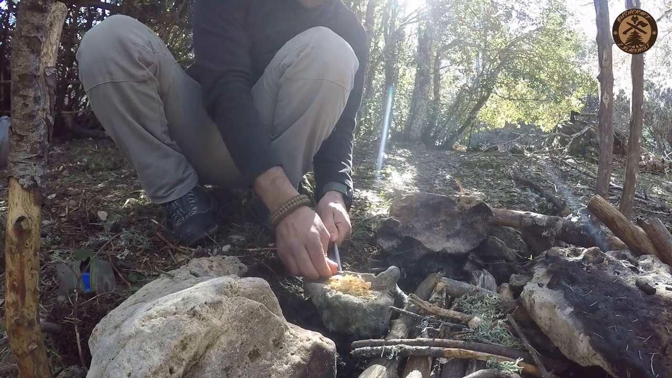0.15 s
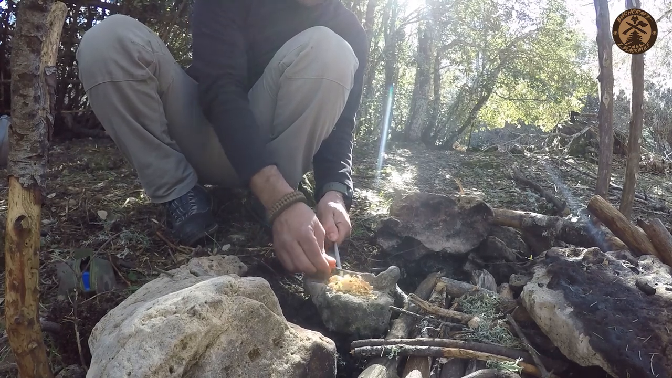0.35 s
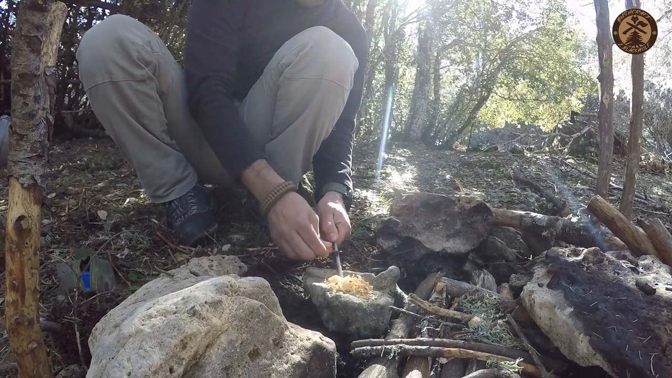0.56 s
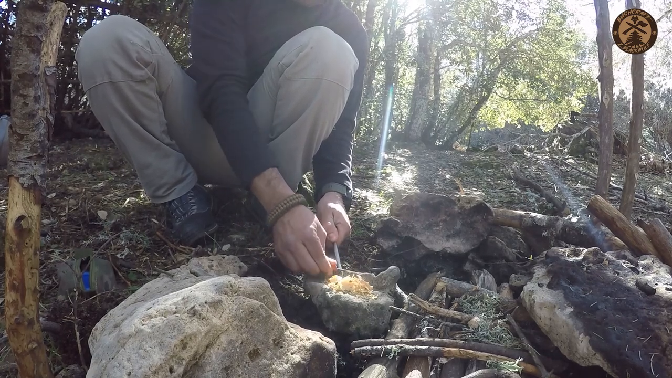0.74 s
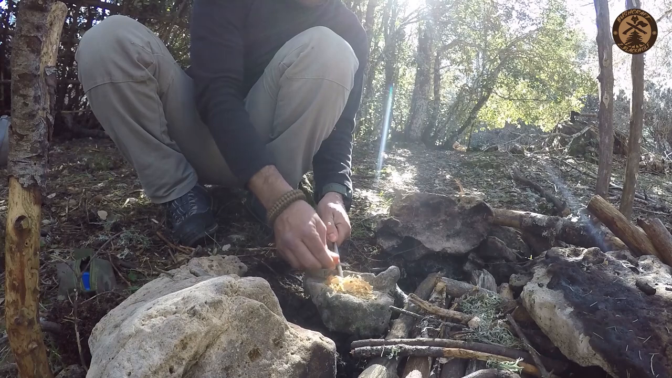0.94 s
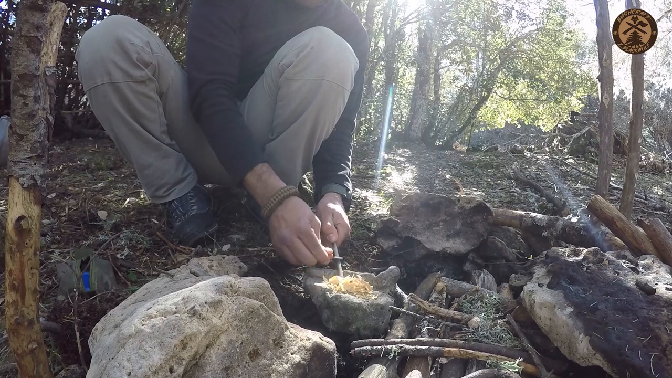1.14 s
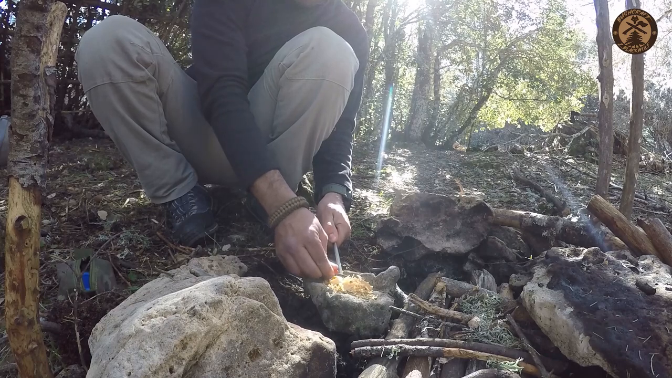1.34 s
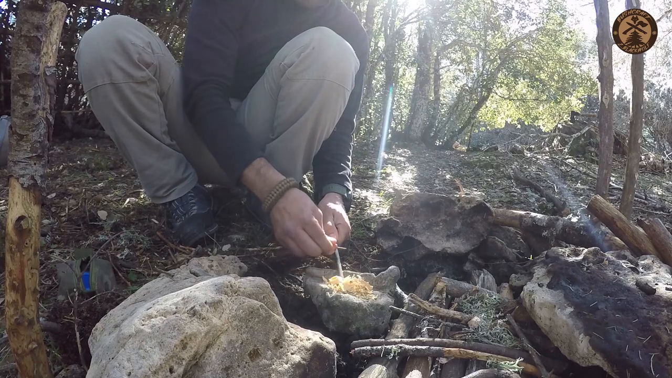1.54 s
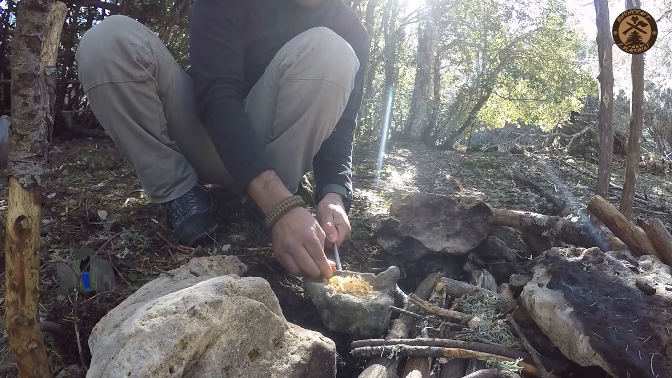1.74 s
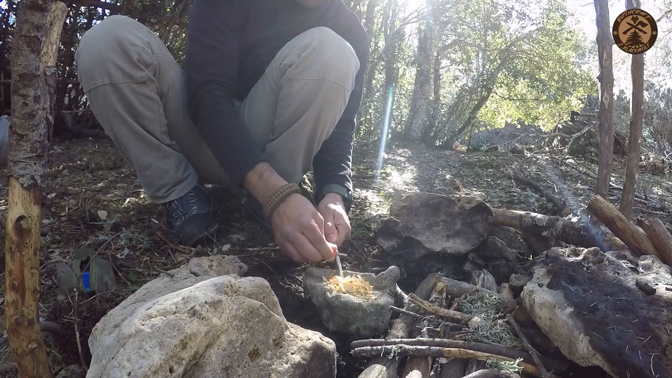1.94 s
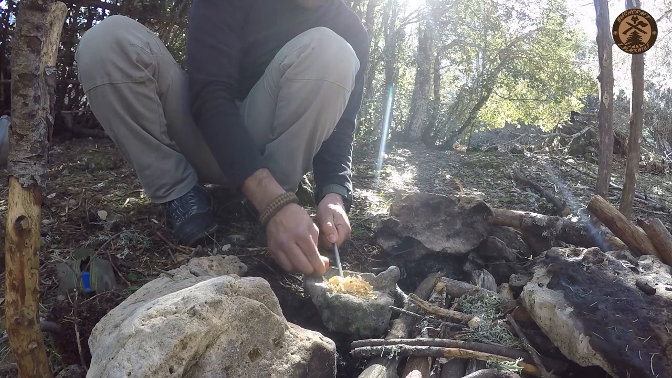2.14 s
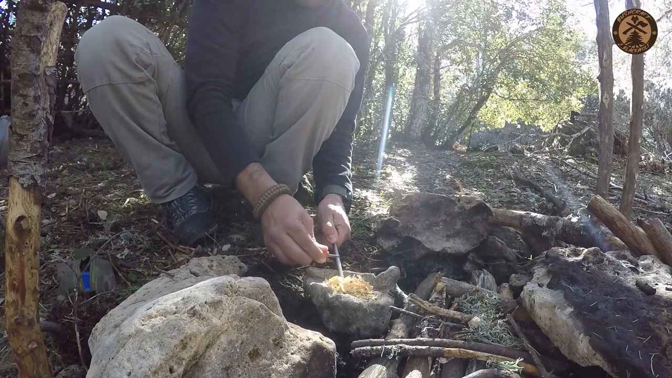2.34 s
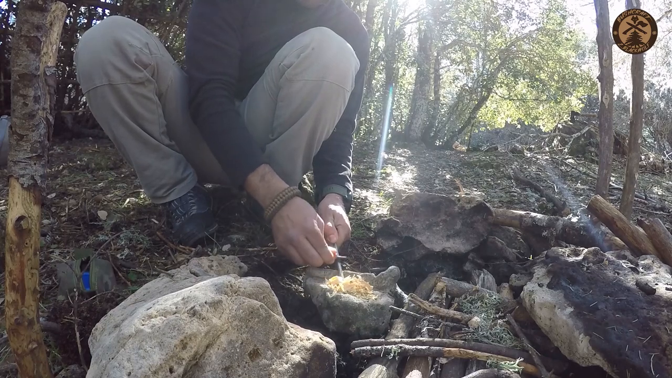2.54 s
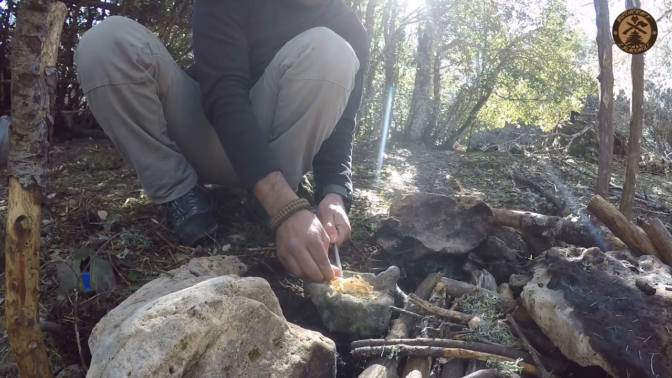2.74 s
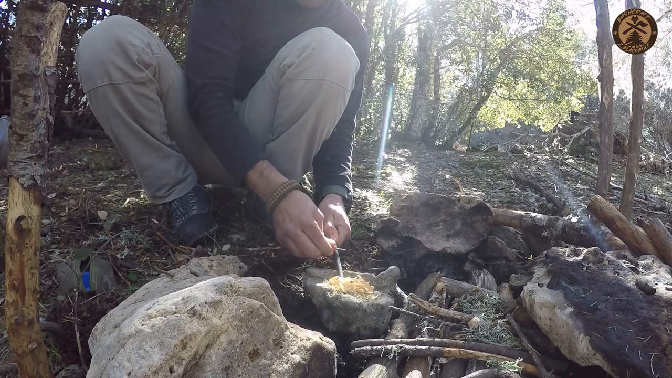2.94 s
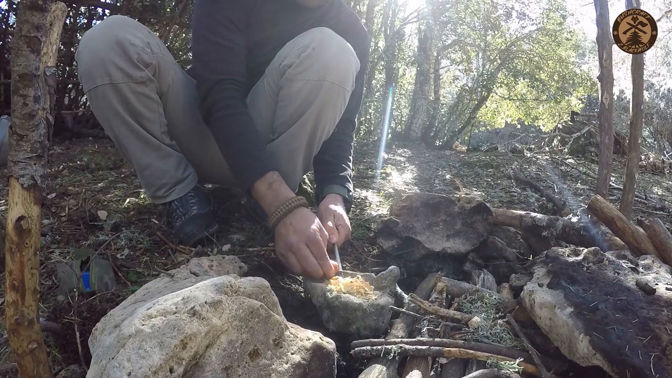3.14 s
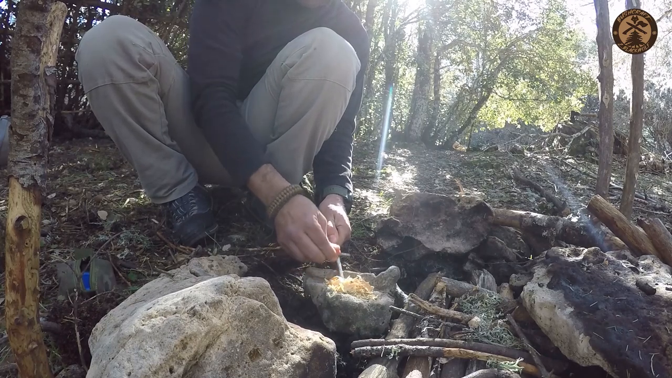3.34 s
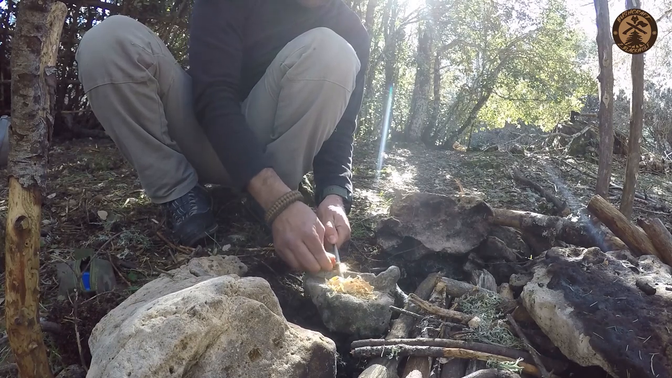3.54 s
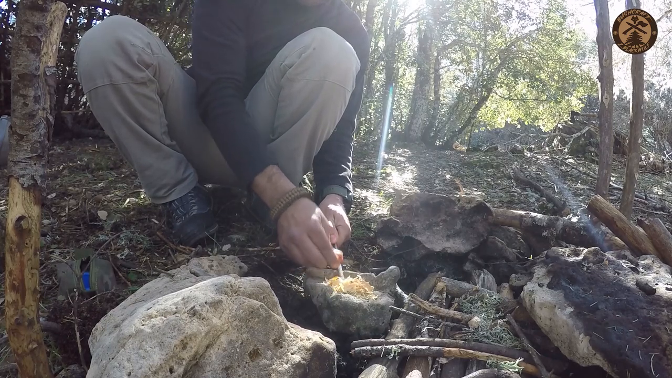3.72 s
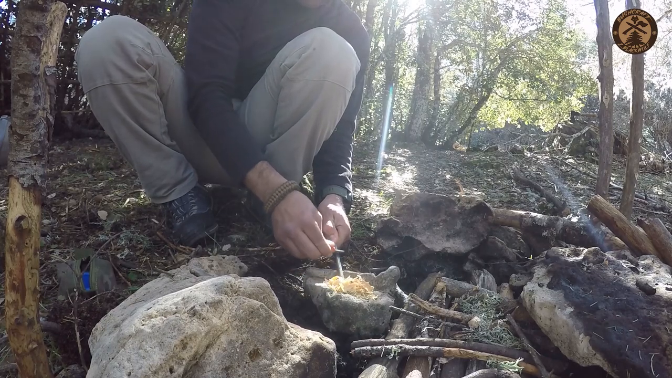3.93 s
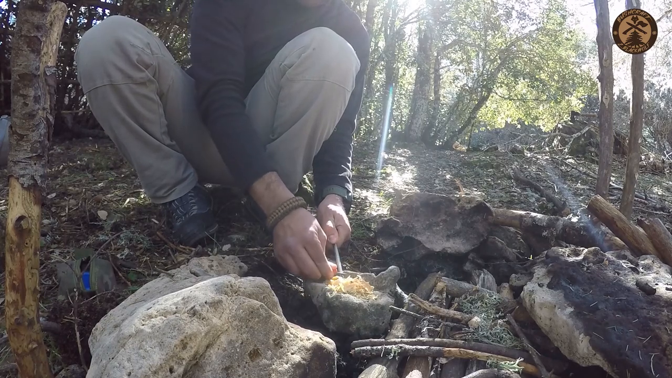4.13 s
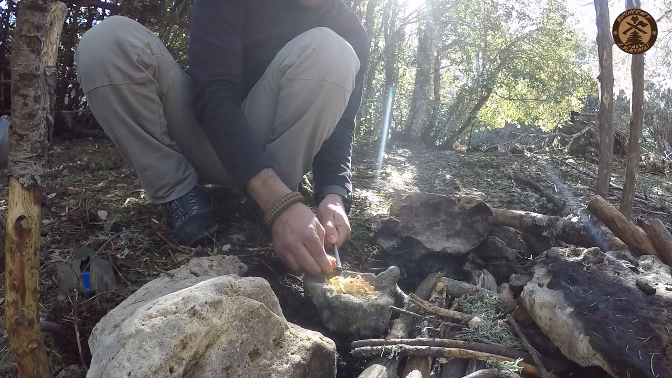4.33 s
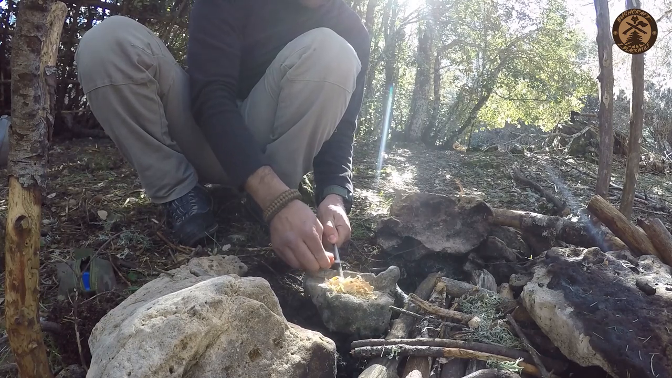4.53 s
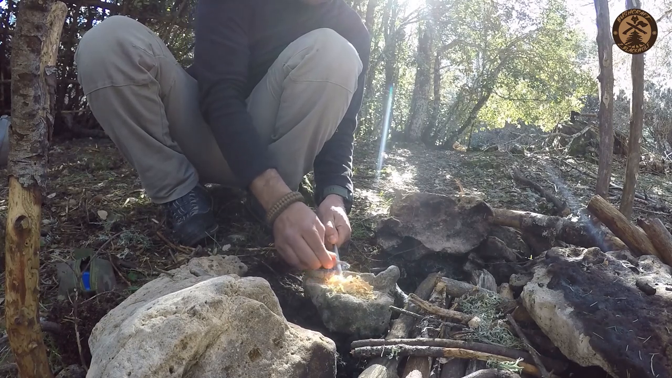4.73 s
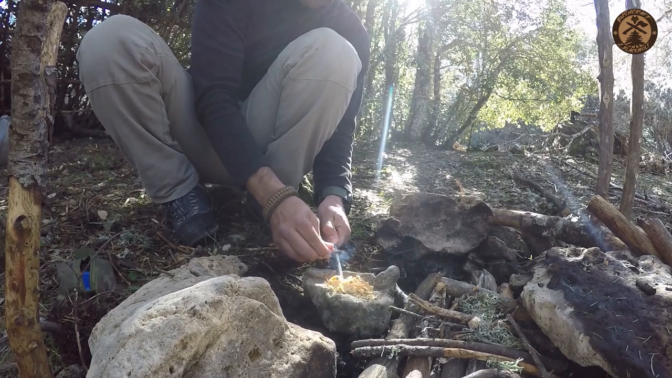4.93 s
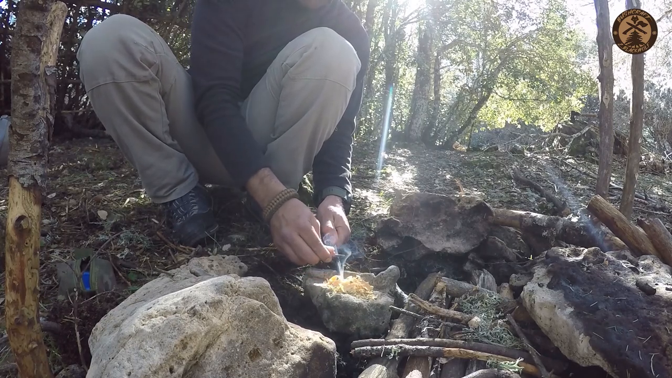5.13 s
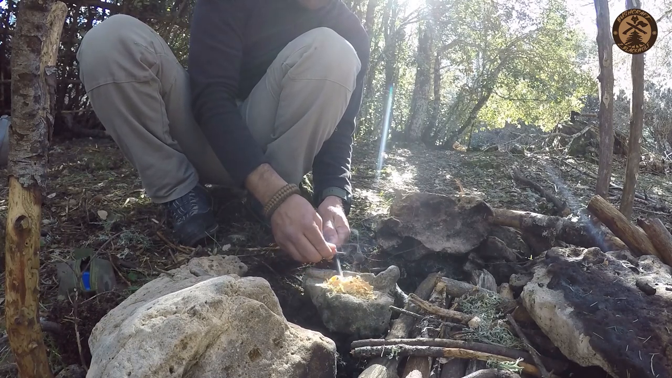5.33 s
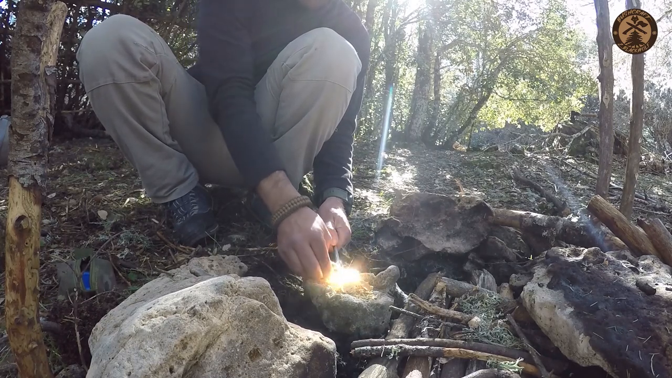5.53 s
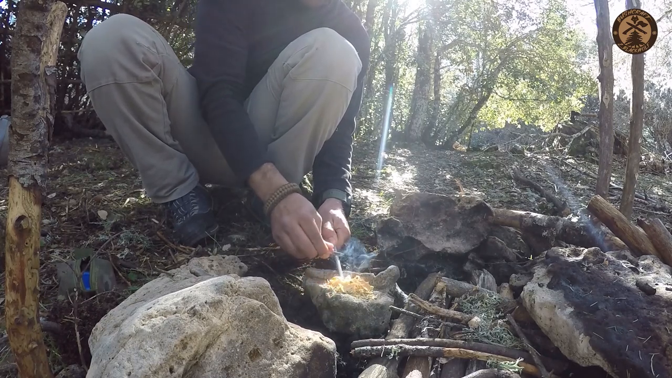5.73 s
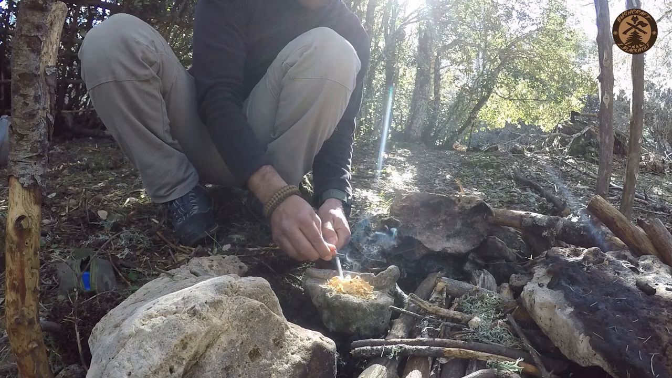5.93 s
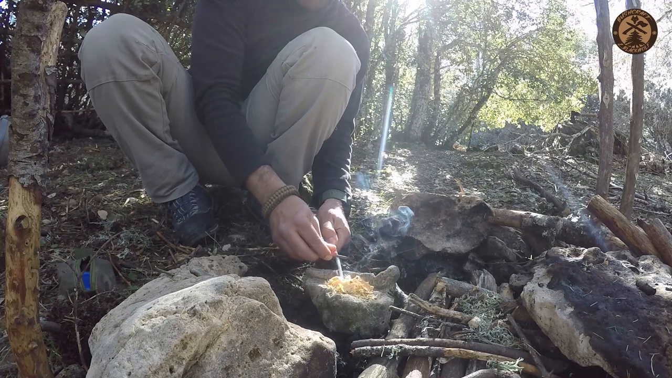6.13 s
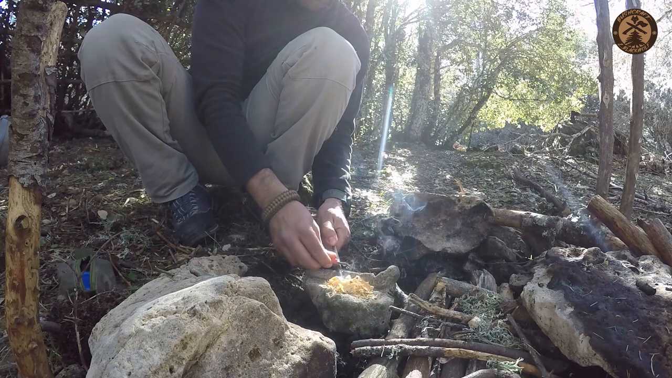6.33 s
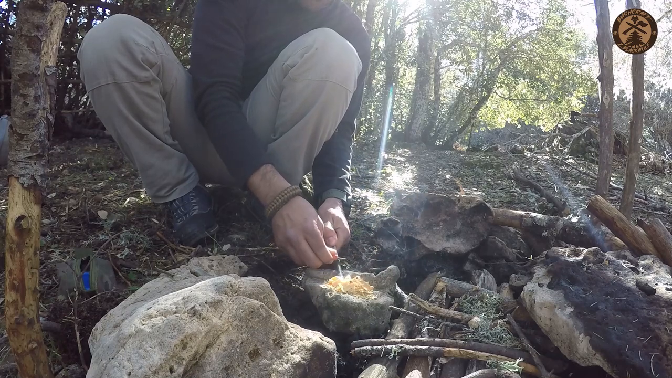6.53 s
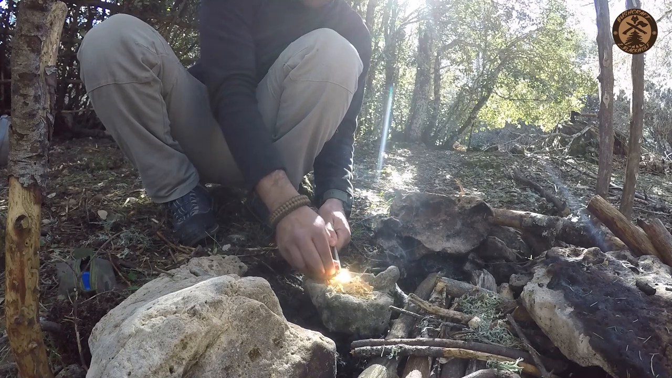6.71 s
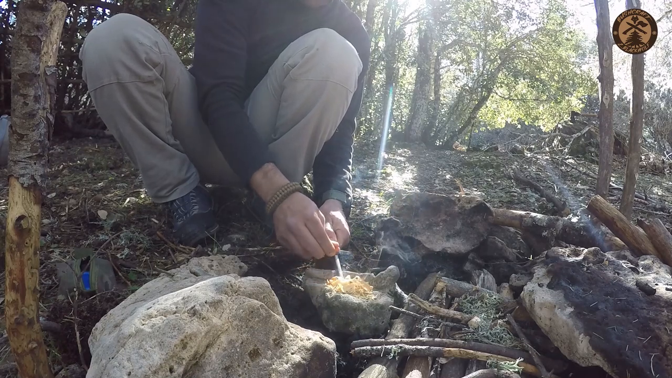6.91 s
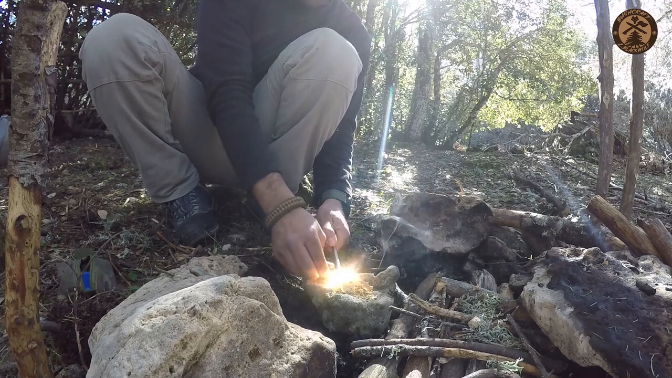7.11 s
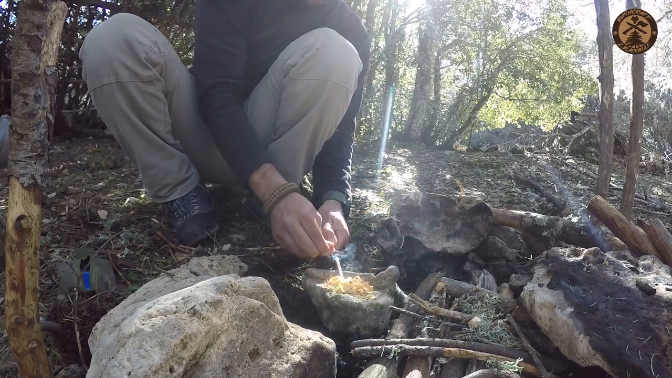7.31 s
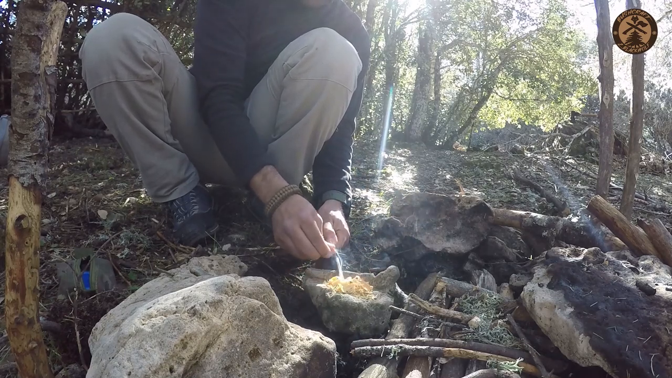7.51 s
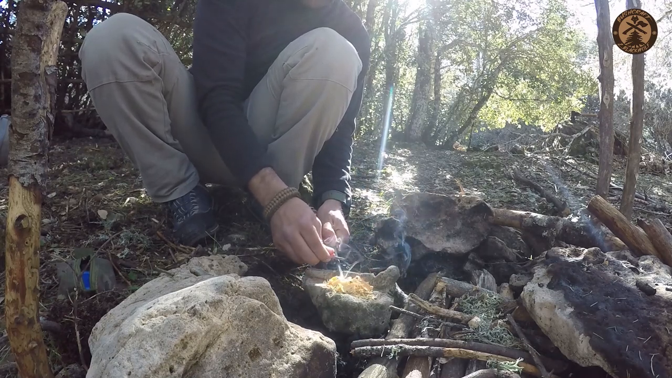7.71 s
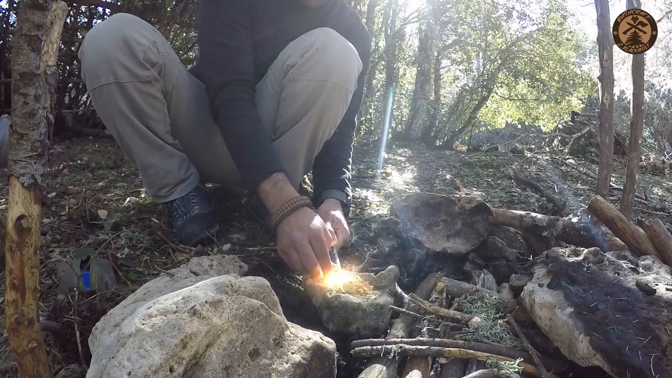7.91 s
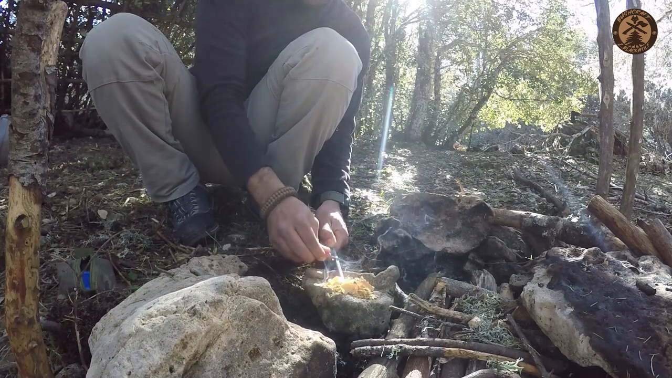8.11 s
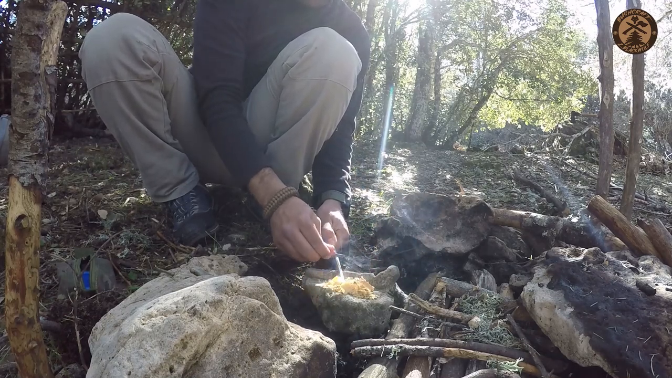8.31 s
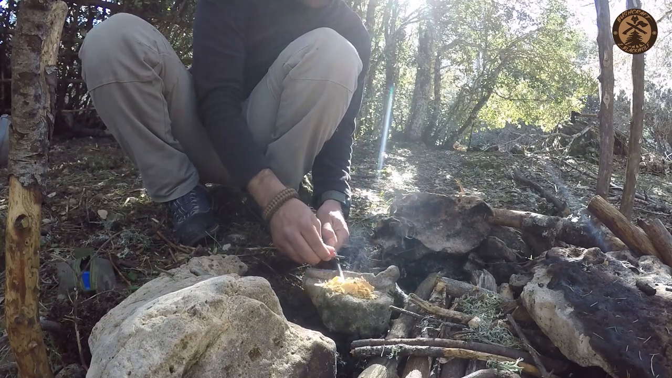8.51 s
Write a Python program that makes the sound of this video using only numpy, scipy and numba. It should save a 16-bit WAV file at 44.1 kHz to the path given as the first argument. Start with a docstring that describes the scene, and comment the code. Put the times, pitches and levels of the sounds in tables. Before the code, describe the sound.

Quiet woodland air, a low rumble under faint hiss, runs throughout. At 0 s a light steel scrape is already under way, with soft dull hand bumps near 0.1 s and tiny spark crackles around 0.35 s. From 0.6 to 4.4 s, nine more faint, thin, hissing strokes follow about every half second, most led by a crisp metallic tick; a spark pops at 2.2 s. At 4.6 s the edge bites hard, with a low bump and a rasp, then sizzling sparks until 5.1 s. A louder, longer tearing stroke swells at 5.5 s with pops. After small ticks and bumps, hard rasps come at 6.6 and 7.1 s, the latter bursting into crackle and fizz around 7.35 s. The last, at 7.9 s, sets off the loudest snaps near 8.1 s, sputtering out by 8.6 s. Close, dry, about a metre away, with faint scattering from stones and trees.

```python
"""In a quiet wood, a low rumble under a faint hiss goes on throughout; a light scrape of steel opens the scene.
A steel striker is worked along a fire steel over tinder, about a metre away. Each stroke swells and sags,
and many start with a tick as the edge lands. Ten light strokes hiss finely; five hard ones bite and rasp.
Sparks, most of them around the hard strokes, pop and sizzle; the hands make soft bumps.
All of it is made from random noise, tiny clicks and short pushes, shaped by filters and resonances."""
import sys
import numpy as np
from scipy import signal
from scipy.fft import rfft, irfft
from scipy.io import wavfile
from scipy.ndimage import uniform_filter1d
from numba import njit

SR = 44100
rng = np.random.default_rng(int(sys.argv[2]) if len(sys.argv) > 2 else 0)


def to_wav(s):
    """Save 16-bit WAV."""
    ch = np.atleast_2d(s).T  # columns
    pcm = np.round(np.clip(ch, -1, 1) * 32767)  # PCM
    wavfile.write(sys.argv[1], SR, pcm.astype(np.int16))


N = 381906  # length in samples


def undb(db):
    """Turn decibels into a gain."""
    return 10 ** (np.asarray(db) / 20)


def unit(x):
    """Scale to an average strength (rms) of 1."""
    return x / np.sqrt(np.mean(x ** 2))


def even(x, window_s=0.018):
    """Hold the rms near 1 over a short window, keeping the fine grain."""
    power = np.abs(uniform_filter1d(x ** 2, int(window_s * SR) + 1))
    return x / np.sqrt(power + 1e-12)


def add(track, s, sound):
    """Mix a sound into the track from time s on."""
    i = max(int(s * SR), 0)
    track[i:i + len(sound)] += sound[:len(track) - i]


def cut(x, hz, kind, order=4):
    """Low-pass or high-pass filter."""
    return signal.sosfilt(signal.butter(order, min(hz, .45 * SR), kind, fs=SR, output="sos"), x)


def resonate(x, hz, width_hz):
    """One resonance, gain 1 at its centre."""
    return signal.lfilter(*signal.iirpeak(min(hz, .45 * SR), hz / width_hz, fs=SR), x)


@njit
def slide(x, hz, width):
    """A resonance whose centre moves, gain 1 at the centre."""
    y, band, low = np.empty(len(x)), 0., 0.
    for i in range(len(x)):
        g, k = np.tan(np.pi * hz[i] / SR), width / hz[i]
        v = (band + g * (x[i] - low)) / (1 + g * (g + k))
        band, low, y[i] = 2 * v - band, low + 2 * g * v, k * v
    return y


def colour(x, points, size=4096):
    """Filter with the given (pitch_hz, level_db) spectrum, without sounding before its input."""
    hz, db = np.transpose(points)
    grid = np.maximum(np.arange(size // 2 + 1) * SR / size, 1)
    level_db = np.interp(np.log(grid), np.log(hz), db)
    # folding the cepstrum gives a minimum-phase filter
    cepstrum = irfft(np.log(undb(level_db)))
    cepstrum[1:size // 2] *= 2
    cepstrum[size // 2 + 1:] = 0
    response = irfft(np.exp(rfft(cepstrum)))
    return signal.fftconvolve(x, response)[:len(x)]


def walk(rate):
    """Smooth random drift with a new target rate times a second, rms 1."""
    knots = np.arange(N) / SR * rate
    return unit(np.interp(knots, np.arange(N // 10), rng.standard_normal(N // 10)))


def gate(age, length_s, attack_s, release_s):
    """Gain that ramps up, holds until length_s and dies away."""
    fade = np.exp(-np.clip((age - length_s) / release_s, 0, 30))
    return np.clip(age / attack_s, 0, 1) * fade


# Spectrum of the still air among the trees, relative levels: (pitch_hz, level_db)
WOOD_SPECTRUM = [(12, -35.5), (20, -4.5), (59, -1), (80, -10.5), (148, -17), (207, -21), (259, -21.5),
                 (306, -23), (549, -28), (834, -29), (958, -30), (1100, -31.5), (2330, -32), (8170, -38.5),
                 (15500, -47)]
WOOD_DB = -55.5


def wood(sway_db=-0.82):
    """Still air among the trees: a low rumble under a faint hiss, swaying slightly in level."""
    air = unit(colour(rng.standard_normal(N), WOOD_SPECTRUM))
    return undb(WOOD_DB + sway_db * walk(2.5)) * air


# Pushes of the edge down the rod; level and sheen are starting points that the scrape varies:
# (start_s, rising_pressure_s, easing_pressure_s, peak_level_db, swell_to_peak_db, sag_after_peak_db,
#  sheen_above_8_khz_relative_to_level_db)
STROKES = [(0.0, 0.081, 0.26, -49.5, 4, 2.5, -13.5), (0.620, 0.17, 0.11, -47, 9.5, 5.5, -9),
           (1.167, 0.18, 0.12, -45.5, 9.5, 22, -9.5), (1.66, .10, 0.091, -48, 0, -1, -4),
           (2.133, 0.04, 0.039, -48.5, 1, -0.5, -5.5), (2.600, .12, .13, -45, 6.5, 10, -7.5),
           (3.063, 0.12, .10, -46.5, 3.5, 3.5, -9), (3.538, 0.11, 0.077, -41.5, 13.5, 11.5, -6),
           (4.011, 0.18, 0.075, -46, 9.5, 13, -7), (4.313, 0.072, 0.099, -50.5, 5, 3.5, -10),
           (4.576, 0.1, 0.16, -33.5, 21.5, 6.5, -7), (5.483, 0.16, 0.16, -28, 27.5, 16, -5.5),
           (6.641, .15, 0.056, -34, 15, 13, -11.5), (7.096, 0.11, 0.087, -29, 31.5, 7.5, -10),
           (7.872, .135, 0.066, -29.5, 27.5, 4, -8)]
STROKE_ATTACK_S, STROKE_RELEASE_S = .014, 0.011  # the edge takes hold; it lifts off (time constant)
SWELL_CURVE, SAG_CURVE = 1.4, 0.59  # above 1: rounded at the peak; below 1: falls quickly from it


def strokes():
    """Each stroke swells, sags and lifts off; gives gain, sheen in dB and place on the rod (0 top, 1 tip)."""
    t, table = np.arange(N) / SR, np.array(STROKES)
    current = np.maximum(np.searchsorted(table[:, 0], t) - 1, 0)
    start, rise_s, ease_s, db, swell_db, sag_db, sheen_db = table[current].T
    age, length_s = t - start, rise_s + ease_s
    to_peak = np.clip(1 - age / rise_s, 0, 1)
    past_peak = np.clip((age - rise_s) / ease_s, 0, 1)
    pressure = undb(db - swell_db * to_peak ** SWELL_CURVE - sag_db * past_peak ** SAG_CURVE)
    place = np.clip(age / (length_s + 2 * STROKE_RELEASE_S), 0, 1)
    return pressure * gate(age, length_s, STROKE_ATTACK_S, STROKE_RELEASE_S), sheen_db, place


def grains(rate, spread_db):
    """Tiny fractures, rate per second at random moments, of random size and sign."""
    happens = rng.random(N) < rate / SR
    size_db = spread_db * np.minimum(rng.standard_normal(N), 2)
    return unit(happens * rng.choice([-1, 1], N) * undb(size_db))


# Resonances of striker and rod, damped by the fingers: (pitch_hz, width_hz, level_db)
STEEL_RESONANCES = [(1220, 460, -13), (3440, 360, -6.5), (3990, 100, -5.5), (4700, 530, -10),
                    (5800, 1200, 1.5), (6470, 160, 0), (7790, 170, -4.5), (8900, 208, 1), (10700, 460, -53),
                    (12400, 670, -18)]


def steel(push, shift_db=0):
    """Striker and rod ring briefly in the hand; a moving edge feeds each resonance now more, now less."""
    out = 0
    for hz, width, db in STEEL_RESONANCES:
        drift_db = shift_db * walk(18) if shift_db else 0
        out = out + undb(db + drift_db) * resonate(push, hz, width)
    return out


# Resonances that slide down as the edge travels along the rod: (start_pitch_hz, end_pitch_hz, width_hz, level_db)
SLIDING_RESONANCES = [(9920, 4500, 480, -5.5), (13000, 7100, 760, -18)]


def shaving(place, flutter_db=3.5, blade_hz=1880, stiffen_hz=170, blade_width_hz=110, blade_db=2,
            wander_hz=20, top_hz=12500):
    """Fine grit sounds the steel; the blade's low note lifts mid-stroke, where it is pressed hardest."""
    grit = grains(rate=14000, spread_db=10.5) * undb(flutter_db * walk(110))
    note_hz = blade_hz + stiffen_hz * np.sin(np.pi * place) + wander_hz * walk(30)
    out = steel(grit, shift_db=2) + undb(blade_db) * slide(grit, note_hz, float(blade_width_hz))
    for start_hz, end_hz, width, db in SLIDING_RESONANCES:
        sliding_hz = start_hz * (end_hz / start_hz) ** place
        out = out + undb(db) * slide(grit, sliding_hz, float(width))
    return cut(out, top_hz, "low", order=4)


# Spectrum of tearing chips, relative levels: (pitch_hz, level_db)
RASP_SPECTRUM = [(40, -4), (130, -1.5), (300, -12.5), (430, -8.5), (700, -13), (1200, -14.5), (2200, -4.5),
                 (4200, -4.5), (5500, -1.5), (7500, -3), (9400, -4), (10700, -16.5), (12500, -19),
                 (15000, -30.5)]
# Resonances of the rod pressed hard on its support: (pitch_hz, width_hz, level_db)
PRESSED_RESONANCES = [(1225, 280, -12), (1465, 82, -10.5), (1765, 97, -10.5), (2236, 61, -11.5),
                      (2630, 65, -11.5), (3250, 440, -31.5), (3660, 110, -14)]


def tearing(chips):
    """Coarse chips crack broadly and knock on the pressed rod."""
    knock = sum(undb(db) * resonate(chips, hz, width) for hz, width, db in PRESSED_RESONANCES)
    return colour(chips, RASP_SPECTRUM) + knock


def along_rod(x, place, near_s=0.000635, far_s=0.000708, slip_s=.00006, slip_hz=24, echo_db=-8):
    """Treble returns twice from the rod's held end; its path lengthens with travel and wavers as the edge slips."""
    i, treble = np.arange(N), cut(x, 2700, "high", order=2)
    lag = (near_s + (far_s - near_s) * place + slip_s * walk(slip_hz)) * SR
    return x + sum(undb(echo_db * trip) * np.interp(i - trip * lag, i, treble) for trip in (1, 2))


LEAST_BITE = .07  # share of coarse chips in even the lightest stroke
DIG_IN_DB = 7.5  # the edge bites this much more readily at the tip than at the top of the rod
STUTTER_DB, STUTTER_HZ = 4.5, 89.4  # towards the tip a biting edge catches and skips
DEEPEN_DB, DEEPEN_HZ = 2, 2500  # the lower range grows by this much from the top of the rod to the tip
SHEEN_HZ, SHEEN_WANDER_DB = 8000, 3.5  # where the sheen begins; its random drift
SHEEN_FADE_DB = 13.5  # scaled by 0.5 - bite: sheen fades towards the tip when light, grows when hard


def scrapes(bite_db=-38, bite_range_db=6.0, chatter_db=2.5, crackle_db=-5, uneven_db=1.41):
    """A light edge hisses in the steel's resonances; pressed harder it tears off coarse chips."""
    force, sheen_db, place = strokes()
    force = force * undb(uneven_db * walk(45))
    depth_db = 20 * np.log10(force + 1e-9) + DIG_IN_DB * (place - .5)
    # bite moves smoothly from shaving to tearing around bite_db
    bite = np.clip(LEAST_BITE + 1 / (1 + np.exp((bite_db - depth_db) / bite_range_db)), 0, 1)
    stutter = undb(STUTTER_DB * place * np.sqrt(bite) * walk(STUTTER_HZ))
    fade_db = SHEEN_FADE_DB * (0.5 - bite) * (.5 - place)
    sheen = undb(sheen_db + fade_db + SHEEN_WANDER_DB * walk(25))
    # a dense stream of chips, with single larger ones snapping off as the edge sticks and slips
    stream = grains(rate=6000, spread_db=5.5) * undb(chatter_db * walk(200))
    chips = stream + undb(crackle_db) * grains(rate=170, spread_db=0.0)
    deepen = undb(DEEPEN_DB * (place - .5)) - 1
    out = 0
    for texture, share in ((shaving(place), 1 - bite), (tearing(chips), bite)):
        texture = along_rod(texture, place)
        texture = texture + deepen * cut(texture, DEEPEN_HZ, "low", order=1)
        # the finest chips give the sheen on top, which changes along the stroke
        body = even(cut(texture, SHEEN_HZ, "low", order=9))
        top = even(cut(texture, SHEEN_HZ, "high", order=9))
        out = out + np.sqrt(share) * (body + sheen * top)
    return force * stutter * out


# Soft bumps of the hands: (start_s, peak_level_db, lowest_pitch_hz, highest_pitch_hz)
BUMPS = [(0.079, -51.5, 200, 586), (0.095, -38.5, 25, 91), (0.116, -41.5, 60, 425), (4.666, -36, 118, 210),
         (5.317, -50, 129, 368), (6.144, -53, 120, 274), (6.434, -47, 219, 380), (7.189, -41, 50, 140),
         (8.04, -52, 70, 168.4)]


def bumps(rise_s=0.0058, size=8192):
    """Dull knocks as the hands press down or shift their grip: short swells of filtered noise."""
    out, t = np.zeros(N), np.arange(size) / SR
    for s, db, low_hz, top_hz in BUMPS:
        thud = rng.standard_normal(size) * t * np.exp(-t / rise_s)
        bump = cut(cut(thud, top_hz, "low", order=3), low_hz, "high", order=2)
        add(out, s, undb(db) * bump / np.abs(bump).max())
    return out


# Loose shavings that flare up, levels before the overall flare gain: (start_s, length_s, level_db)
FLARES = [(0.336, 0.033, -50), (0.371, 0.048, -47), (2.252, 0.039, -57), (4.873, 0.04, -34),
          (4.89, .034, -32.5), (4.944, 0.038, -40), (4.977, 0.047, -42), (5.085, 0.021, -38.5),
          (5.847, 0.03, -44), (5.893, 0.041, -55.5), (7.323, 0.032, -29), (7.348, 0.048, -34),
          (7.399, 0.022, -38), (7.427, 0.051, -39), (7.531, 0.031, -32), (8.065, 0.04, -26.5),
          (8.111, 0.048, -29), (8.178, 0.012, -40), (8.261, .018, -39), (8.342, 0.032, -32)]
FLARE_RISE, FLARE_FADE_DB = 0.11, 14.5  # share of its length in which a flare catches; fading over that length
FLARE_RELEASE_S = 0.0042  # it goes out (time constant)


def flares(sputter_db=4, gain_db=-2, low_hz=500, size=8192):
    """Loose shavings catch quickly, sizzle in uneven spurts, fade and go out."""
    burn, age = np.zeros(N), np.arange(size) / SR
    for s, length_s, db in FLARES:
        fading = undb(db - FLARE_FADE_DB * age / length_s)
        add(burn, s, fading * gate(age, length_s, FLARE_RISE * length_s, FLARE_RELEASE_S))
    sizzle = tearing(grains(rate=4500, spread_db=8.5) * undb(sputter_db * walk(220)))
    return undb(gain_db) * even(cut(sizzle, low_hz, "high", order=1)) * burn


# Bursting sparks, levels before the overall pop gain: (start_s, peak_level_db, centre_pitch_hz, ring_strength_db)
POPS = [(0.3384, -31.5, 6700, 12), (0.3903, -31, 4730, 12), (2.2235, -13.5, 3740, 7.5),
        (4.6405, -18.5, 6100, 5), (4.659, -16.5, 3480, 20), (4.8632, -23, 7250, 5),
        (4.8911, -18.5, 8850, 3), (4.9004, -23, 6400, 9), (4.9143, -25, 2200, 7), (4.9516, -32, 9080, 5),
        (4.9763, -26, 3500, -2), (4.9829, -22, 3500, -3), (5.0689, -35.5, 3500, -7), (5.541, -17, 5500, -6),
        (5.5898, -13, 5000, -3), (5.7203, -15.5, 5430, 12), (6.832, -18.5, 3200, 1),
        (7.1848, -18, 5800, -3), (7.322, -15.5, 5210, -1), (7.3612, -9.5, 6800, 0), (7.429, -30, 6080, 12),
        (7.443, -21, 6000, 10), (7.5328, -31, 4640, 23), (7.9594, -19, 2840, 13), (7.983, -11, 6000, 9),
        (8.069, -1, 5200, 4.5), (8.0975, -15.5, 7480, 3), (8.1181, -5, 4700, -1.5), (8.2744, -18, 2170, -1),
        (8.2884, -7.5, 4100, -10), (8.3467, -19.5, 6100, 18.5), (8.3658, -20.5, 5590, 13),
        (8.4798, -30.5, 4810, 1), (8.5978, -36.5, 5800, 7), (8.6136, -28, 5600, 5), (8.6328, -26, 6100, 11)]


def pops(gain_db=-2, fizz_db=-10, fizz_s=0.0014, tail_db=-36, tail_s=0.011, width_hz=2400, low_hz=800, size=4096):
    """A burning chip bursts: a crack, a quick fizz and a faint tail, each burst at its own pitch."""
    out, t = np.zeros(N), np.arange(size) / SR
    fade = undb(fizz_db) * np.exp(-t / fizz_s) + undb(tail_db) * np.exp(-t / tail_s)
    for s, db, hz, focus_db in POPS:
        burst = (t == 0) + rng.standard_normal(size) * fade  # the crack is a single click
        ring = resonate(resonate(burst, hz, width_hz), hz, width_hz)
        pop = cut(tearing(burst + undb(focus_db) * ring), low_hz, "high", order=1)
        add(out, s, undb(db + gain_db) * pop / np.abs(pop).max())
    return out


# Touches of the edge on the rod; the low ring is relative to ring_db, and the level sets
# the peak of the whole tick: (start_s, peak_level_db, low_ring_db)
TICKS = [(0.5852, -28.5, -13.5), (1.158, -16.5, -18), (1.652, -14, -24), (2.1309, -17.5, -19),
         (2.593, -13.5, -25), (3.045, -21.5, -35), (3.072, -43, -21), (3.5082, -15, -48),
         (3.5444, -33.5, 1), (4.0091, -20.5, -8.5), (5.1953, -38.5, -1), (5.3168, -47.5, 8),
         (6.0456, -33.5, -34), (6.374, -48.5, 18), (6.4068, -23.5, -39), (6.4397, -46, 13),
         (7.0413, -15, -17)]
# Spectrum of a steel touch, relative levels: (pitch_hz, level_db)
TOUCH_SPECTRUM = [(100, -20), (650, -32), (950, -14.5), (2500, -3.5), (5000, -6), (6500, 9), (8200, 0),
                  (8900, 3.5), (11000, -25), (15000, -45)]


def ticks(steel_db=6, rebound_db=-12, rebound_s=0.001196, settle_db=-30, settle_s=0.0032,
          ring_hz=1810, ring_width_hz=120, ring_db=23, low_hz=750, top_hz=11000, size=4096):
    """The edge lands with one sharp push, rebounds and settles in milliseconds; the free blade rings low."""
    out, t = np.zeros(N), np.arange(size) / SR
    for s, db, share_db in TICKS:
        lateness, grip = rng.uniform(-1, 1, 2)  # small chance changes of rebound time and ring pitch
        push = (t == 0) + undb(settle_db) * rng.standard_normal(size) * np.exp(-t / settle_s)
        add(push, rebound_s * (1 + 0.17 * lateness), undb([rebound_db]))
        touch = colour(push, TOUCH_SPECTRUM) + undb(steel_db) * steel(push)
        touch = cut(cut(touch, low_hz, "high"), top_hz, "low", order=2)
        ring = resonate(push, ring_hz * (1 + 0.046 * grip), ring_width_hz)
        tick = touch + undb(ring_db + share_db) * ring
        add(out, s, undb(db) * tick / np.abs(tick).max())
    return out


def surroundings(x, stones_db=-21, stones_s=0.0041, trees_db=-28, trees_s=0.077, dull_hz=7000, size=16384):
    """Nearby stones scatter the sound almost at once; the trees return a very faint tail."""
    t = np.arange(size) / SR
    fade = np.exp(-t / np.array([[stones_s], [trees_s]])) * (t > .001)
    near, far = rng.standard_normal((2, size)) * fade
    echo = undb(stones_db) * near / np.linalg.norm(near) + undb(trees_db) * far / np.linalg.norm(far)
    return x + signal.fftconvolve(x, cut(echo, dull_hz, "low", order=1))[:N]


def scene():
    """The work with striker and rod, echoed by its surroundings, in the quiet of the wood."""
    work = scrapes() + bumps() + flares() + pops() + ticks()
    return (wood() + surroundings(work))[None]


TOP_HZ = 15400


def record(dry):
    """The recorder cuts the top steeply, above TOP_HZ."""
    return signal.sosfilt(signal.ellip(10, .2, 70, TOP_HZ, fs=SR, output="sos"), dry)


dry = scene()
out = record(dry)
to_wav(out)
```